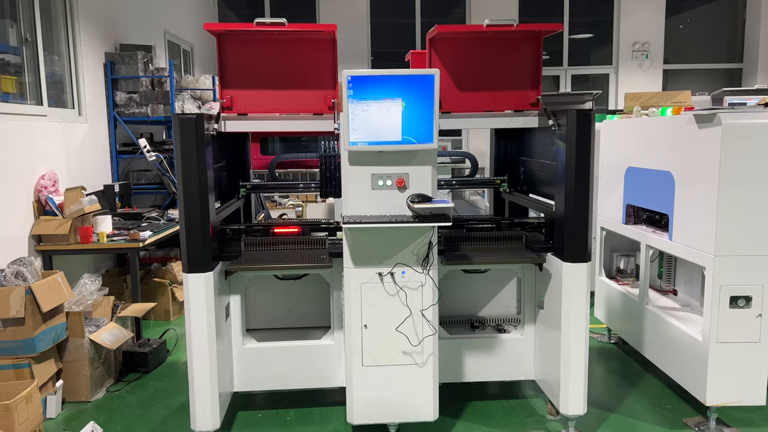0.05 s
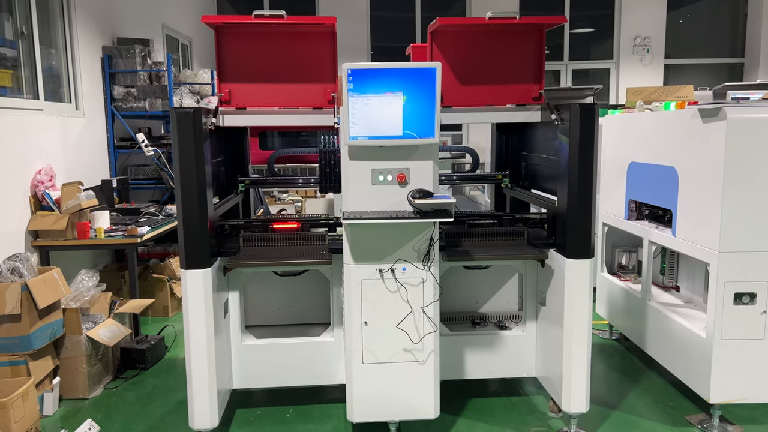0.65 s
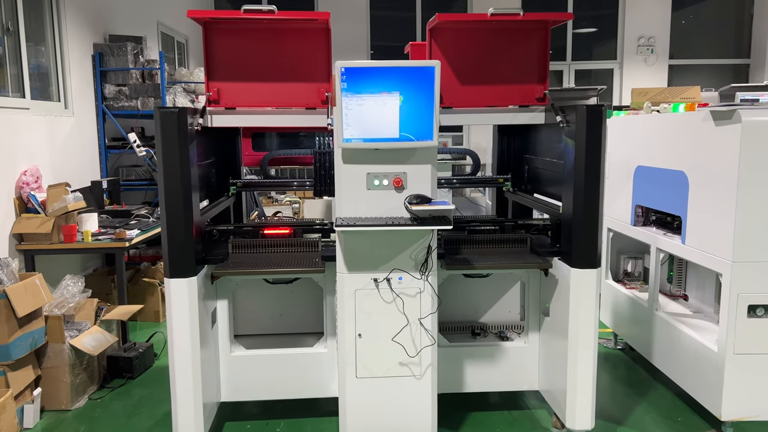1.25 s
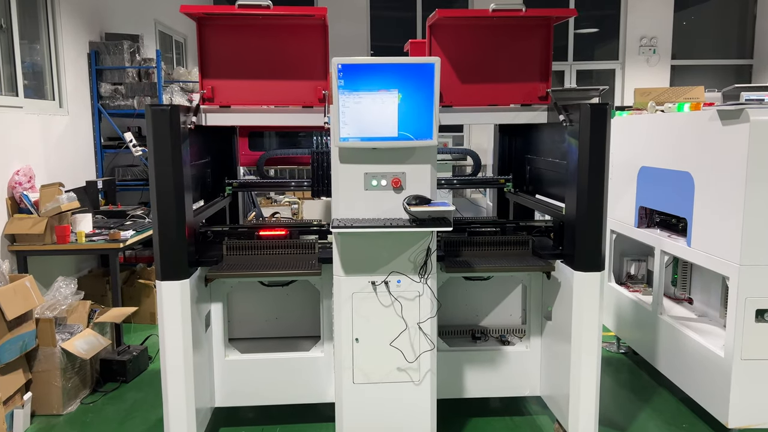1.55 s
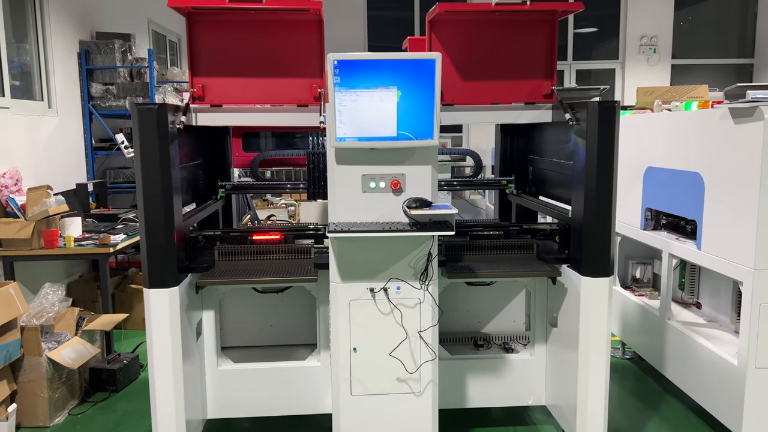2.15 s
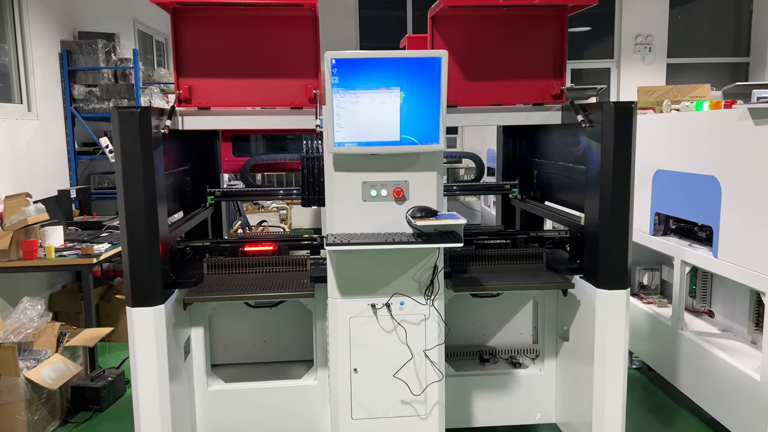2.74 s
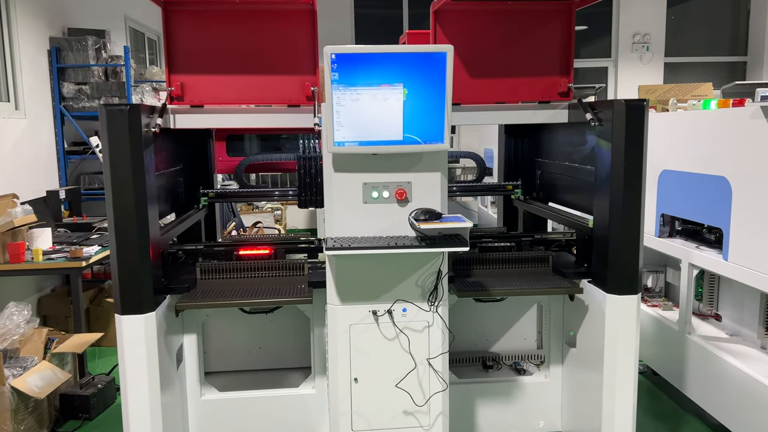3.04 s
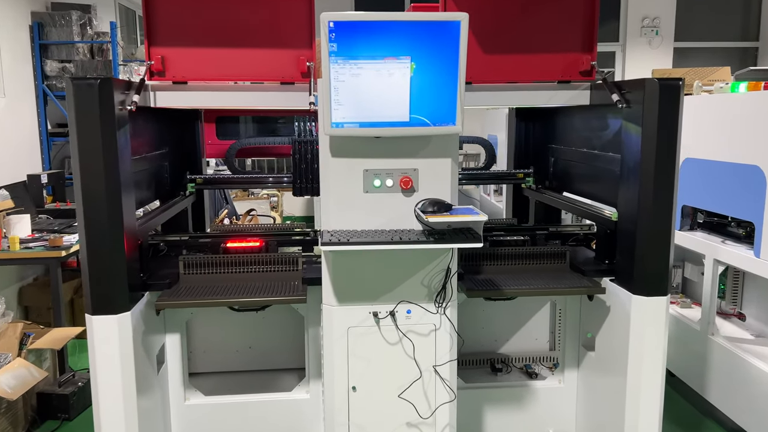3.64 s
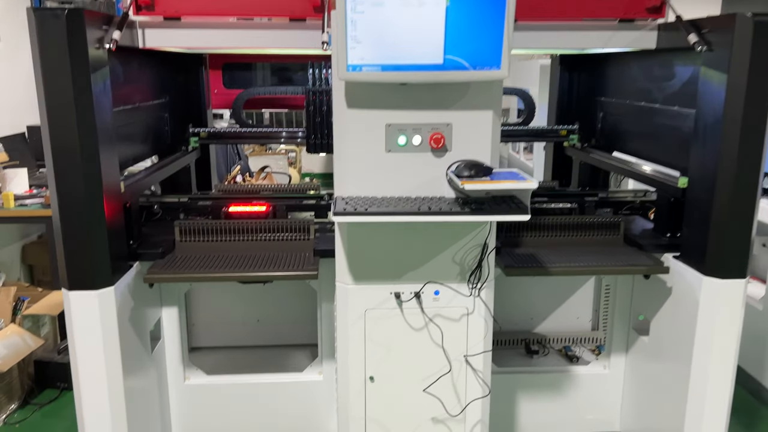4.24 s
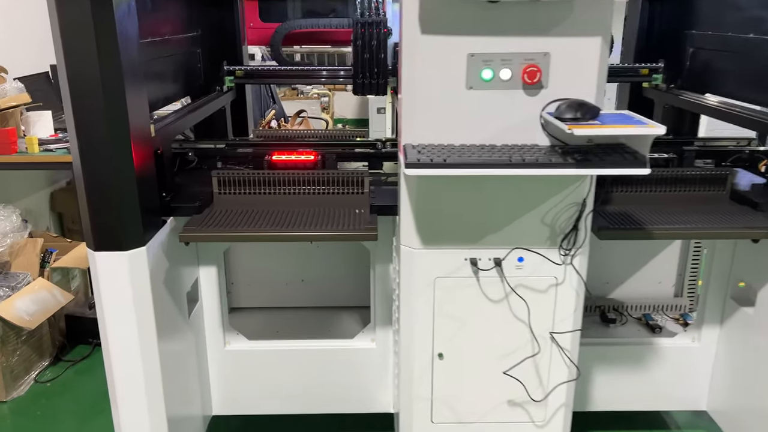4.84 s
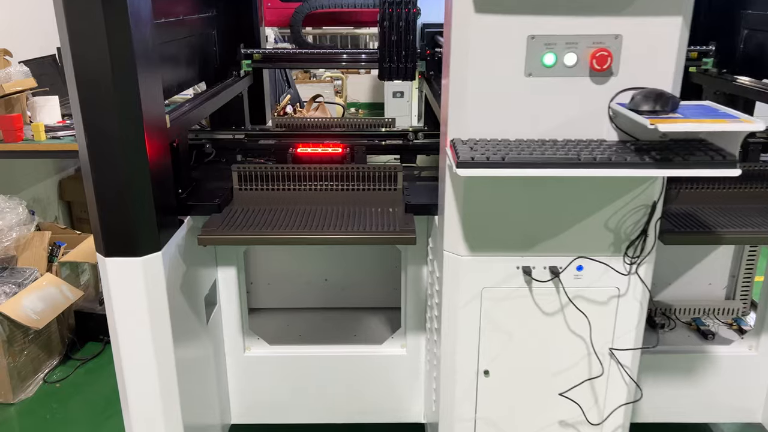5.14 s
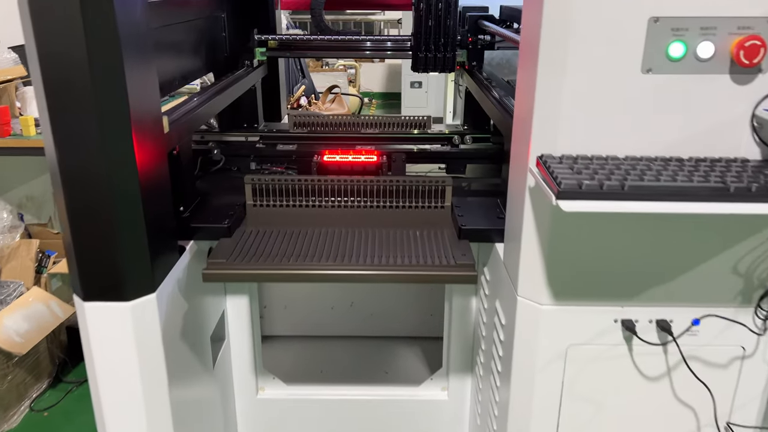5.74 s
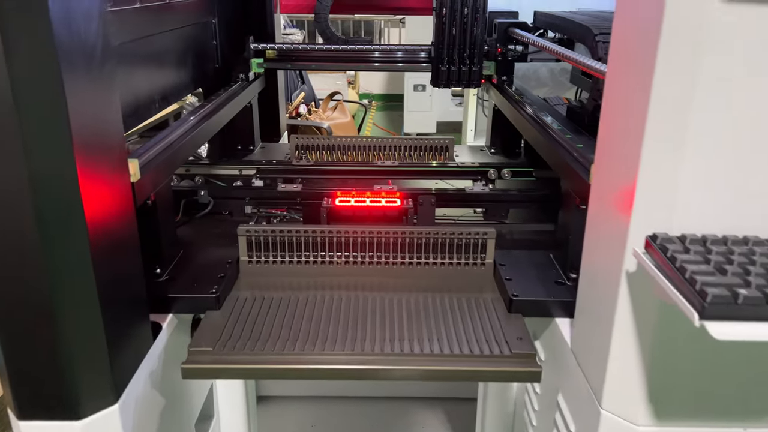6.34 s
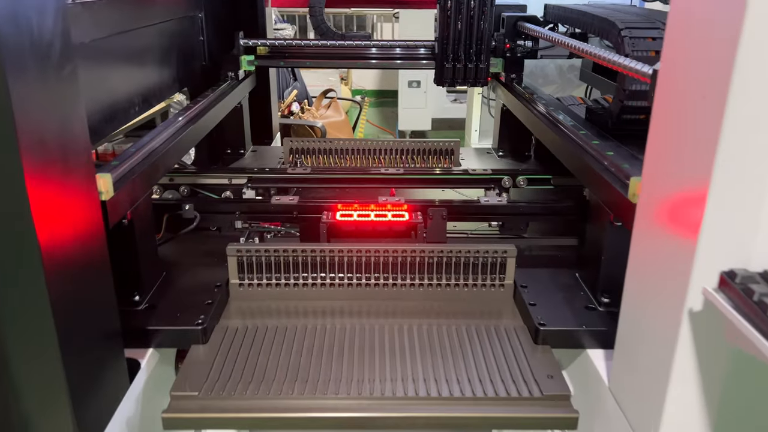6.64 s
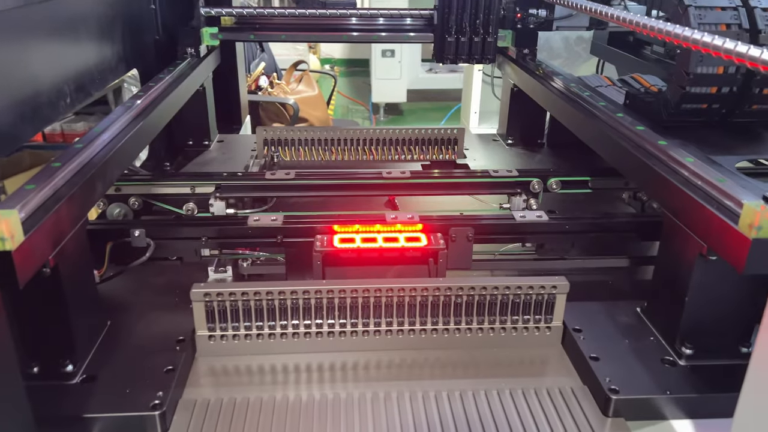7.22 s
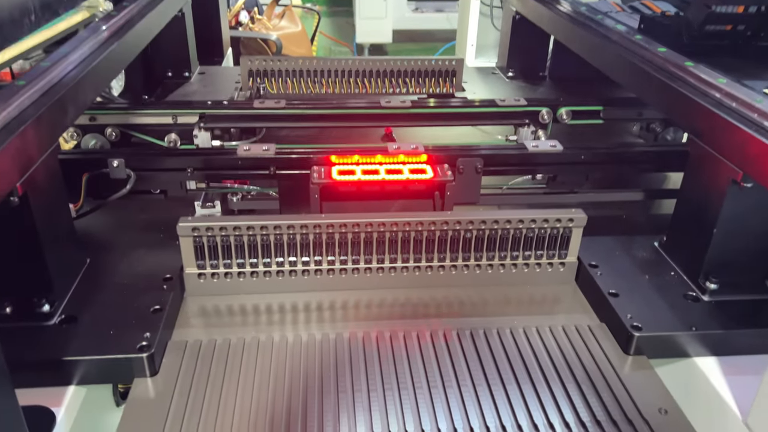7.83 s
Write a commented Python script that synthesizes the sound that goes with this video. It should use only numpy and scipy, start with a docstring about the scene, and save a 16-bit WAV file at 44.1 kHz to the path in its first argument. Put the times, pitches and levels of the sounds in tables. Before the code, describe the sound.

Short, uneven mechanical whirrs and swishes from a machine's sliding head, with brief motor whines, low panel booms and a steady room hum.

```python
"""A pick-and-place machine works in a small workshop while the listener walks up to it.
From the start its head and gantry dart to and fro over the hum of a vacuum pump and a cooling fan.
In each move, rolling balls excite the rails and drive screws, the frame rumbles, and often a servo sings.
From about 1 s a cabinet panel booms now and then; around 4-5 s the servo tones crowd together.
Towards the end, close to the machine, the panel's resonance is at its loudest."""
import sys
import numpy as np
from scipy import signal
from scipy.fft import rfft, irfft
from scipy.io import wavfile
from scipy.ndimage import uniform_filter1d

SR = 44100
rng = np.random.default_rng(int(sys.argv[2]) if len(sys.argv) > 2 else 0)


def output_pcm(signal):
    """Save a mono or channel-first signal as 16-bit PCM at the path in sys.argv[1].

    Samples are clipped to [-1, 1] before scaling.
    """
    pcm = np.clip(np.atleast_2d(signal).T, -1, 1) * 32767
    wavfile.write(sys.argv[1], SR, np.round(pcm).astype(np.int16))


N = 347508
TIME = np.arange(N) / SR
FREQS = np.maximum(np.arange(N // 2 + 1) * SR / N, 1)
SCREW_RAMPS_S = (.102, .104)   # rise and fall, quicker than those of the rails

# darts of head and gantry, with levels at full speed: (start [s], rail duration [s], screw lag [s],
# screw duration [s], rush [dB], sizzle [dB], whirr [dB], rasp [dB], shake [dB])
AXIS_MOVES = [(0.08, 0.316, -0.011, 0.336, -41.5, -47.5, -33, -37, -36.5),
              (0.379, 0.36, 0.01, 0.399, -36.5, -41.9, -33.0, -40, -37.0),
              (0.661, 0.269, -0.014, 0.296, -43, -49.5, -37, -38.1, -37.0),
              (0.788, 0.239, 0.017, 0.275, -38.6, -46.0, -31, -36, -35.5),
              (1.201, 0.32, 0.02, 0.318, -35.0, -41.1, -29.1, -38.5, -31.0),
              (1.618, 0.311, -0.002, 0.349, -34.2, -41, -31, -39, -33),
              (2.081, 0.379, -0.026, 0.42, -34, -41.5, -30.5, -36.5, -32.5),
              (2.18, 0.2, 0.005, 0.19, -42.0, -54.0, -33.5, -41.0, -38.0),
              (2.497, 0.261, 0.02, 0.305, -44, -49, -37.5, -54, -37),
              (2.691, 0.246, 0.006, 0.235, -35, -41.0, -31, -36.5, -36.0),
              (2.845, 0.354, 0.007, 0.367, -45, -50, -37.5, -47, -36.0),
              (3.157, 0.265, 0.003, 0.293, -34.5, -42.5, -32, -40, -33.5),
              (3.38, 0.215, 0.0, 0.151, -43, -47, -35.5, -46, -38.5),
              (3.569, 0.341, 0.0, 0.427, -33.5, -39, -29.5, -36.5, -32),
              (4.02, 0.324, -0.004, 0.297, -39.5, -44.5, -31.5, -41.6, -36.5),
              (4.303, 0.247, -0.02, 0.311, -37.5, -43.8, -33.5, -48.7, -34.5),
              (4.495, 0.248, 0.004, 0.303, -34.5, -40.5, -29.5, -35.5, -33.5),
              (4.706, 0.194, -0.003, 0.211, -36.0, -42.5, -33.0, -43, -31),
              (4.903, 0.232, -0.02, 0.284, -37, -40, -33, -41.5, -35),
              (5.108, 0.347, -0.011, 0.408, -36.8, -42.5, -33, -46.6, -35.5),
              (5.481, 0.318, 0.048, 0.272, -40.0, -46.9, -31.5, -37, -34),
              (5.901, 0.255, -0.007, 0.278, -38.0, -46.3, -29.5, -38.0, -32),
              (6.232, 0.234, 0.017, 0.223, -36.0, -45, -31, -44.5, -32.5),
              (6.474, 0.306, 0.008, 0.283, -38.5, -44.6, -32.5, -43, -34.5),
              (6.682, 0.32, -0.01, 0.364, -35, -44, -33, -44, -36.5),
              (6.947, 0.267, -0.006, 0.336, -34.5, -41.5, -31.5, -40, -34),
              (7.168, 0.226, -0.0, 0.254, -40.5, -53, -33.5, -38, -37),
              (7.362, 0.397, 0.021, 0.42, -34.2, -42.0, -30.6, -38, -33),
              (7.55, 0.21, 0.02, 0.21, -41.0, -53.0, -32.5, -39, -39.0)]
def drive_power(part, rise_s, fall_s, ease_s=.025):
    """Forced excitation: each move feeds power to a part as it speeds up, cruises and brakes."""
    start, rail_s, lag_s, screw_s, rush, sizzle, whirr, rasp, shake = np.transpose(AXIS_MOVES)
    sliding, turning = (start, rail_s), (start + lag_s, screw_s)
    timing, db = {"rush": (sliding, rush), "sizzle": (sliding, sizzle), "whirr": (turning, whirr),
                  "rasp": (turning, rasp), "shake": (turning, shake)}[part]
    return uniform_filter1d(ramped_power(zip(*timing, db), rise_s, fall_s), int(ease_s * SR))


# spectra of the rails' rush and sizzle: (frequency [Hz], relative level [dB])
RUSH_SPECTRUM = [(1200, -12), (2500, -5), (3300, -3), (4000, -2), (4700, -1.2), (5300, 1.1), (6900, -1.3),
                 (7400, -5.5), (8300, -5), (9200, -13), (12000, -38)]
SIZZLE_SPECTRUM = [(7000, -19), (8300, 2), (9000, 1), (11300, 3), (13300, -5.5), (15700, -3)]
# direction of the rush: (time [s], left minus right [dB])
RUSH_PAN = [(0, 1), (.58, 1), (1.05, -0.5), (4.9, -0.5), (5.25, 1), (5.8, 0), (6.3, 1.5), (6.8, -0.5),
            (7.88, -0.5)]
def rails(knocks_per_s=20000, flutter_db=.56):
    """Rolling contact noise: carriage balls rush along the guide rails and sizzle at full speed."""
    rush_db = decay_db(drive_power("rush", rise_s=.132, fall_s=.15), t60=.67, rest_db=-52.5)
    sizzle_db = decay_db(drive_power("sizzle", rise_s=.11, fall_s=.14), t60=.36, rest_db=-63)
    balls = rolling(knocks_per_s, speed_of(rush_db), t60=.05, ring_db=1.5, glide=.03)
    rush = from_db(rush_db) * radiate(balls, response(RUSH_SPECTRUM))
    sizzle = from_db(sizzle_db) * shaped_noise(response(SIZZLE_SPECTRUM))
    rush_pan_db, = in_time(RUSH_PAN)
    return from_db(flutter_db * drift(8.7)) * (pan(rush, rush_pan_db) + sizzle)


# spectra of the screws' whirr and rasp: (frequency [Hz], relative level [dB])
WHIRR_SPECTRUM = [(350, -7), (630, -2.2), (810, 3.5), (920, 1.5), (1200, 2), (1450, 1.4), (1650, -0.6),
                  (2000, -5), (2600, -20), (4000, -16), (8000, -56)]
RASP_SPECTRUM = [(1400, -17), (1900, 1), (2200, 0), (2700, -1.5), (3200, -4.5), (3700, -13), (5000, -30)]
# direction of the whirr: (time [s], left minus right [dB])
WHIRR_PAN = [(0, 0.32), (4.3, 0.42), (5.5, 1), (7.1, 1.6), (7.88, 0.84)]
def screws(knocks_per_s=3500, flutter_db=.9):
    """Impact excitation: balls circulating in the screw nuts whirr; a higher rasp is damped sooner."""
    whirr_db = decay_db(drive_power("whirr", *SCREW_RAMPS_S), t60=.8, rest_db=-40.5)
    rasp_db = decay_db(drive_power("rasp", *SCREW_RAMPS_S), t60=.47, rest_db=-46)
    speed = speed_of(whirr_db)
    long_ring = rolling(knocks_per_s, speed, t60=.2, ring_db=10, glide=.05)
    short_ring = rolling(knocks_per_s, speed, t60=.12, ring_db=4, glide=.04)
    whirr = from_db(whirr_db) * radiate(long_ring, response(WHIRR_SPECTRUM))
    rasp = from_db(rasp_db) * radiate(short_ring, response(RASP_SPECTRUM))
    whirr_pan_db, = in_time(WHIRR_PAN)
    return from_db(flutter_db * drift(20)) * (pan(whirr, whirr_pan_db) + rasp)


# response of the frame: (frequency [Hz], relative level [dB])
FRAME_SPECTRUM = [(150, -31), (205, -6), (252, -2), (300, -2.5), (360, -0.5), (440, -3), (530, -5.5),
                  (620, -14), (1000, -55)]
def frame(knocks_per_s=2000, gain_db=.05):
    """Structure-borne sound: the moving gantry shakes the welded frame."""
    level_db = decay_db(drive_power("shake", *SCREW_RAMPS_S), t60=1.1, rest_db=-40.5)
    shake = rolling(knocks_per_s, speed_of(level_db), t60=.35, ring_db=0, glide=.15)
    rumble = steadied(radiate(shake, response(FRAME_SPECTRUM)), window_s=.122)
    return from_db(level_db + gain_db) * rumble


# motors holding their speed: (start [s], end [s], frequency [Hz], level [dB])
SERVO_TONES = [(.2, .3, 359, -37), (.5, .7, 1200, -42), (.93, 1.08, 800, -42), (1.37, 1.52, 960, -41),
               (1.4, 1.56, 1155, -41), (1.69, 1.87, 1195, -38), (2.16, 2.28, 369, -35.5),
               (2.15, 2.42, 838, -45), (2.24, 2.39, 1115, -40), (2.36, 2.52, 484, -40),
               (2.8, 2.92, 1330, -41.5), (3.26, 3.485, 497, -39), (3.71, 3.81, 440, -34.5),
               (3.7, 3.82, 768, -39.5), (3.8, 3.94, 372, -37), (3.8, 3.96, 484, -38.5),
               (3.8, 3.92, 955, -35.5), (4.08, 4.18, 1010, -43), (4.15, 4.26, 817, -42),
               (4.2, 4.32, 371.4, -30.5), (4.23, 4.33, 259, -33.5), (4.34, 4.49, 373.4, -34),
               (4.64, 4.79, 360, -33), (4.69, 4.84, 424, -33), (4.69, 4.82, 471, -34),
               (4.675, 4.82, 1016, -37), (4.7, 4.82, 855, -41), (4.97, 5.07, 412, -34.5),
               (5.04, 5.17, 428, -33), (5.2, 5.28, 295, -37), (5.23, 5.32, 451, -37.5),
               (5.27, 5.44, 1138, -41), (6.51, 6.62, 258, -37.5), (6.71, 6.81, 425, -37),
               (6.88, 7.05, 1108, -40), (7.52, 7.61, 261, -33), (7.55, 7.81, 557, -38.5)]
def servos():
    """Rotational tones: a motor rises to a grainy pitch, cruises, and sags as the axis brakes."""
    return pan(notes(SERVO_TONES, sag=.03, wander_hz=6, roughness=.5, shiver_hz=36), left_db=1)


# bending modes of the cabinet panel: (frequency [Hz], bandwidth [Hz], relative level [dB])
PANEL_RESONANCES = [(156, 7.9, -1.5), (167.4, 10.5, 7), (167, 15, -12)]
# its booms: (start [s], end [s], frequency [Hz], level [dB])
PANEL_BOOMS = [(.9, 1.1, 172.5, -41), (1.37, 1.62, 166, -40.5), (3.22, 3.45, 165.2, -40.5),
               (3.71, 3.99, 150.3, -35.5), (4.49, 4.61, 167, -38), (4.62, 4.9, 159.9, -38),
               (5.33, 5.48, 166.6, -32.5), (5.47, 5.58, 166.7, -35), (5.73, 5.97, 163.7, -42.5),
               (6.02, 6.15, 162.5, -32.5), (6.15, 6.31, 166.5, -31), (6.35, 6.47, 177, -40),
               (6.62, 6.9, 171, -38), (6.975, 7.075, 169.4, -30), (7.08, 7.18, 174, -32.5),
               (7.52, 7.63, 167.3, -30.5), (7.67, 7.78, 151, -33.5), (7.79, 7.88, 160, -38)]
def cabinet_panel(far_db=-46, near_db=-41, cutoff_hz=90):
    """Modal resonance: a sheet panel murmurs, louder from close by, and booms when pushed."""
    modes = sum(from_db(db) / (1 + 1j * (FREQS ** 2 - hz ** 2) / (FREQS * width))
                for hz, width, db in PANEL_RESONANCES)
    short_circuit = 1 / (1 + (cutoff_hz / FREQS) ** 4)   # a panel hardly radiates below its modes
    murmur = steadied(shaped_noise(modes * short_circuit), window_s=.076)
    approach = from_db(np.linspace(far_db, near_db, N))
    booms = notes(PANEL_BOOMS, sag=.02, wander_hz=2.8, roughness=.12, shiver_hz=10)
    return approach * murmur + pan(booms, left_db=3.5)


# shudders of the base: (start [s], duration [s], relative level [dB])
BASE_SHUDDERS = [(.56, 0.18, -35), (.95, 0.099, -45), (1.4, 0.072, -32), (1.68, 0.44, -36),
                 (2.12, 0.12, -31), (2.32, 0.24, -38.5), (2.89, 0.11, -37), (3.83, 0.11, -30),
                 (4.22, 0.16, -37), (4.74, 0.47, -38), (5.38, 0.18, -35), (6.37, 0.087, -36),
                 (6.62, 0.34, -38), (6.92, 0.19, -34.5), (7.08, 0.25, -32), (7.45, 0.07, -27.5),
                 (7.68, 0.081, -27)]
# response of the base: (frequency [Hz], relative level [dB])
BASE_SPECTRUM = [(58, -30), (74, -14), (86, 13), (97, 12.5), (118, 4), (132, 3.5), (160, 8.5), (220, -66)]
def base(gain_db=-1.5):
    """Damped vibration: the heavy base thrums on after each shudder."""
    power = ramped_power(BASE_SHUDDERS, rise_s=.0081, fall_s=.036)
    level_db = decay_db(power, t60=.77, rest_db=-42)
    return from_db(level_db + gain_db) * steadied(shaped_noise(response(BASE_SPECTRUM)), window_s=.06)


# partials of the vacuum pump: (frequency [Hz], level [dB], wander [Hz])
PUMP_TONES = [(96.4, -50.5, 3.29), (365.7, -52, 2.9)]
def pump(flutter_db=2.6):
    """Periodic forcing: the pump hums in tones that waver in level and pitch."""
    return sum(from_db(db + flutter_db * drift(4.4)) * tone(hz, wander_hz, rate_hz=6.4)
               for hz, db, wander_hz in PUMP_TONES)


# the walk up to the machine: (time [s], relative drone level [dB], scene left minus right [dB])
APPROACH = [(0, -43, 0.5), (.85, -41, 0.5), (1.2, -48, 0.5), (1.8, -42.5, 0.5), (2.8, -43.5, 0.5),
            (3.7, -43, 0.5), (4.1, -46, 0.5), (5.5, -45, 0.5), (6.1, -40, 0.5), (6.45, -49, 0.2),
            (7.1, -37, 0.6), (7.88, -43, 0.5)]
# the deep drone: (frequency [Hz], relative level [dB])
DRONE_SPECTRUM = [(20, -54), (34, -39), (43, -8), (50, 10), (62, 3), (70, -20), (85, -13), (200, -77)]
def drone(mains_db=-5, noise_db=-2):
    """A tone in narrow-band noise: mains hum and a deep drone swell and fade along the walk."""
    level_db, _ = in_time(APPROACH)
    mains = from_db(level_db + mains_db) * tone(49.5, wander_hz=1.2, rate_hz=6.8)
    noise = steadied(shaped_noise(response(DRONE_SPECTRUM)), window_s=.34)
    return pan(mains, left_db=.6) + from_db(level_db + noise_db) * noise


# whine of the cooling fan along the walk: (time [s], level [dB])
FAN_LEVEL = [(0, -45), (.82, -42.5), (1.05, -54), (1.65, -47), (1.9, -60), (2.6, -62), (2.76, -45),
             (3.35, -44), (3.65, -53), (4.1, -60), (7.88, -57)]
def fan(whine_hz=1104, flutter_db=1.8):
    """Tonal fan noise: one thin whine, its amplitude modulated independently on each side."""
    level_db, = in_time(FAN_LEVEL)
    flutter = flutter_db * np.array([drift(8), drift(8)])
    return from_db(level_db + flutter) * tone(whine_hz, wander_hz=2.2, rate_hz=22)


# air of the workshop: (frequency [Hz], relative level [dB])
AIR_SPECTRUM = [(35, -22), (80, 1), (130, 3.5), (400, -5.5), (700, -8), (1300, -9), (3000, -25.5),
                (8000, -64), (16000, -55)]
def room_air(level_db=-39.5):
    """Stationary broadband noise: the room's background, strongest in the bass."""
    return from_db(level_db) * shaped_noise(response(AIR_SPECTRUM))


def rolling(knocks_per_s, speed, t60, ring_db, glide):
    """Shot noise: random ball impacts ring the steel; speed raises rate and pitch, not power."""
    chance = knocks_per_s * speed / SR
    knocks = np.sqrt(rng.poisson(chance, (2, N)) / chance) * rng.standard_normal((2, N))
    # the free length of the steel, and so its pitch, changes as the carriage travels
    travel = np.exp(.06 * drift(.9))
    pitch = speed ** glide * travel
    position = np.cumsum(pitch / np.mean(pitch))
    ringing = np.array([np.interp(position, np.arange(N), side) for side in ring_on(knocks, t60)])
    return knocks + from_db(ring_db) * ringing


def notes(rows, sag, wander_hz, roughness, shiver_hz):
    """Amplitude and frequency modulation: each note swells to its pitch, shivers and sags away."""
    out, wander = np.zeros((2, N)), wander_hz * drift(27)
    shiver = np.array([1 + roughness * (drift(shiver_hz) + 1j * drift(shiver_hz)) for side in "LR"])
    shiver /= np.sqrt(1 + 2 * roughness ** 2)
    for start, end, hz, db in rows:
        on = (TIME > start) & (TIME < end)
        swell = np.sqrt(np.abs(np.sin(np.pi * (TIME[on] - start) / (end - start))))
        pitch = hz * (1 - sag * (1 - swell) ** 2) + wander[on]
        carrier = np.sqrt(2) * np.exp(2j * np.pi * np.cumsum(pitch) / SR)
        out[:, on] += from_db(db) * swell * np.real(shiver[:, on] * carrier)
    return out


def ramped_power(rows, rise_s, fall_s, exponent=.72):
    """Power law: amplitude follows each speed ramp; overlapping events add in power."""
    power = np.zeros(N)
    for start, length, db in rows:
        on = slice(max(int(start * SR), 0), int((start + length) * SR))
        ramp = np.minimum((TIME[on] - start) / rise_s, (start + length - TIME[on]) / fall_s)
        power[on] += (from_db(db) * np.clip(ramp, 0, 1) ** exponent) ** 2
    return power


def decay_db(power, t60, rest_db):
    """Exponential decay: stored energy leaks away until the level settles at rest_db."""
    retained = from_db(-60 / (t60 * SR)) ** 2
    stored = signal.lfilter([1 - retained], [1, -retained], power + 1e-18)
    return 10 * np.log10(stored + from_db(rest_db) ** 2)


def speed_of(level_db):
    """Speed taken as proportional to amplitude; 1 at the mean level."""
    return from_db(level_db - np.mean(level_db))


def ring_on(pair, t60):
    """Reverberation: dense modes or echoes act as convolution with decaying noise."""
    t = TIME[:int(t60 * SR)]
    tail = rng.standard_normal((2, len(t))) * from_db(-60 * t / t60)
    return signal.fftconvolve(pair, tail / np.sqrt(np.sum(tail ** 2) / 2), axes=1)[:, :N]


# the two microphone ports: (frequency [Hz], coherence [0-1], right lead [rad], left minus right [dB])
PORT_COHERENCE = [(50, 1, 0, 1), (100, 0.99, 0, 1), (167, 0.95, 0.37, 2), (315, 0.76, 0, .8),
                  (456, 0.39, 0, 0), (650, 0.18, 1.06, 1.3), (940, 0, 1.3, 1), (1360, 0.29, 3, 0),
                  (1770, 0.3, 2.5, -1.5), (2150, 0.8, 1.17, -4.5), (2420, 0, 2.5, -2), (2930, 0, 4, 0.5),
                  (4170, 0.22, 7, 0), (5000, 0, 9, 5.5), (6800, 0, 11.5, 4), (8540, 0.32, 14, -0.5),
                  (9040, 0.8, 14, 0), (9980, 1, 15.5, -1), (12870, 0.75, 20.5, 0), (13500, 1, 21.5, -0.5),
                  (16500, .95, 26.5, 0)]
def radiate(pair, gain):
    """Partial coherence: two filtered vibrations reach the ports, most alike in bass and top; rms 1."""
    coherence, lead, balance_db = in_frequency(PORT_COHERENCE)
    coherence = np.clip(coherence, 0, 1)
    left, unrelated = rfft(pair) * gain
    right = coherence * np.exp(1j * lead) * left + np.sqrt(1 - coherence ** 2) * unrelated
    return rms_one(irfft(pan(np.array([left, right]), balance_db), N))


def shaped_noise(gain):
    """Source and filter: white noise radiated through a response; rms 1."""
    return radiate(rng.standard_normal((2, N)), gain)


def steadied(pair, window_s):
    """Division by the running rms evens out a vibration's power; rms 1."""
    power = uniform_filter1d(np.mean(pair ** 2, axis=0), int(window_s * SR))
    return rms_one(pair / np.sqrt(power + 1e-6))


def tone(hz, wander_hz, rate_hz):
    """Random frequency modulation of a sine; rms 1."""
    return np.sqrt(2) * np.sin(2 * np.pi * np.cumsum(hz + wander_hz * drift(rate_hz)) / SR)


def drift(rate_hz):
    """Low-passed noise: a slow random fluctuation; rms 1."""
    return rms_one(irfft(rfft(rng.standard_normal(N)) / (1 + (FREQS / rate_hz) ** 2), N))


def pan(sound, left_db):
    """A level difference between the sides sets the direction."""
    return sound * from_db(np.vstack([left_db / 2, -left_db / 2]))


def in_time(rows):
    """Linear interpolation of each column to every sample."""
    s, *columns = np.transpose(rows)
    return [np.interp(TIME, s, column) for column in columns]


def in_frequency(rows):
    """Interpolation of each column over log frequency."""
    hz, *columns = np.transpose(rows)
    return [np.interp(np.log(FREQS), np.log(hz), column) for column in columns]


def response(spectrum):
    """Magnitude response: the gain at every frequency."""
    return from_db(in_frequency(spectrum)[0])


def from_db(db):
    """Decibels to amplitude ratio."""
    return 10 ** (np.asarray(db) / 20)


def rms_one(x):
    """Normalisation to unit power."""
    return x / np.sqrt(np.mean(x ** 2) + 1e-20)


def scene(room_t60=.4, room_db=-15, wall_hz=6000):
    """Superposition: the drives and their dull reverberation, the structure and the background hum."""
    drives = rails() + screws() + servos()
    echo = irfft(rfft(ring_on(drives, room_t60)) / (1 + (FREQS / wall_hz) ** 4), N)
    structure = frame() + cabinet_panel() + base()
    background = pan(pump(), left_db=.6) + drone() + fan() + room_air()
    _, walk_pan_db = in_time(APPROACH)
    return pan(drives + from_db(room_db) * echo + structure + background, walk_pan_db)


def record(dry, start_s=.084, low_cut_hz=36, high_cut_hz=15900):
    """Band limiting: the microphone opens after a moment and cuts the deepest bass and the top."""
    opened = np.clip((TIME - start_s) / .002, 0, 1)
    high_pass = signal.butter(6, low_cut_hz, "high", fs=SR, output="sos")
    low_pass = signal.ellip(10, .05, 60, high_cut_hz, fs=SR, output="sos")
    return signal.sosfiltfilt(low_pass, signal.sosfilt(high_pass, dry) * opened)


dry = scene()
out = record(dry)
output_pcm(out)
```